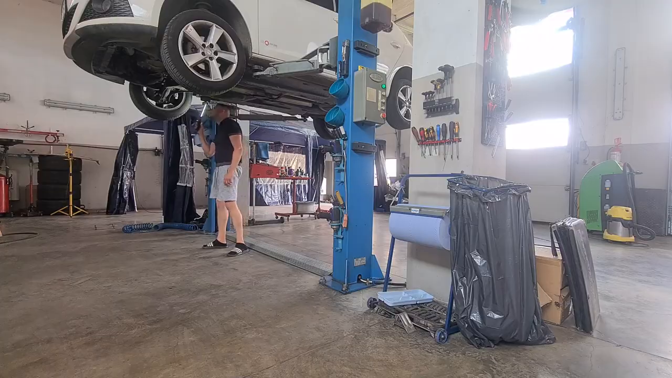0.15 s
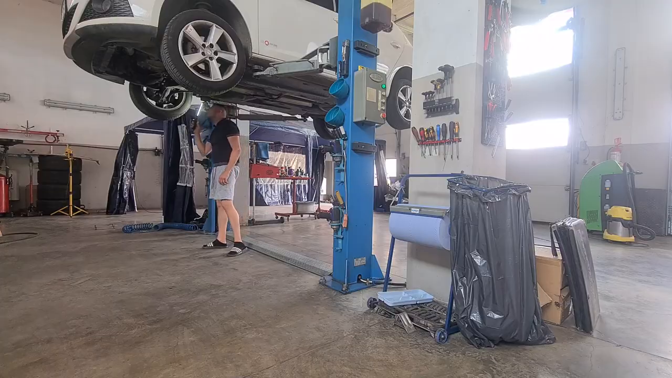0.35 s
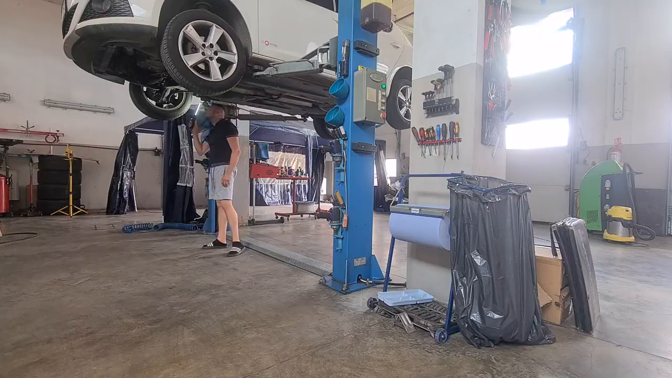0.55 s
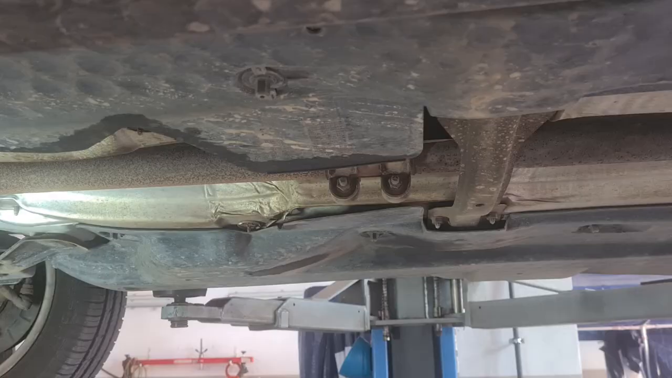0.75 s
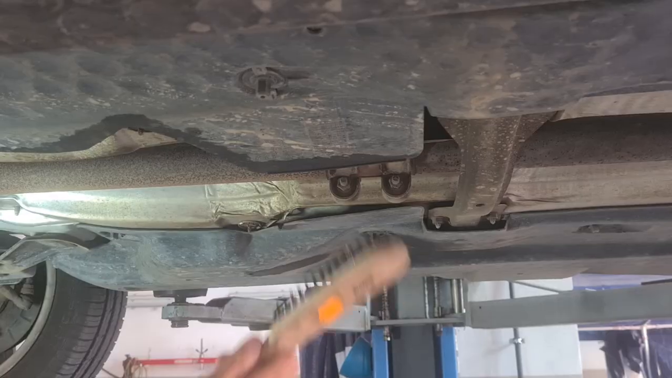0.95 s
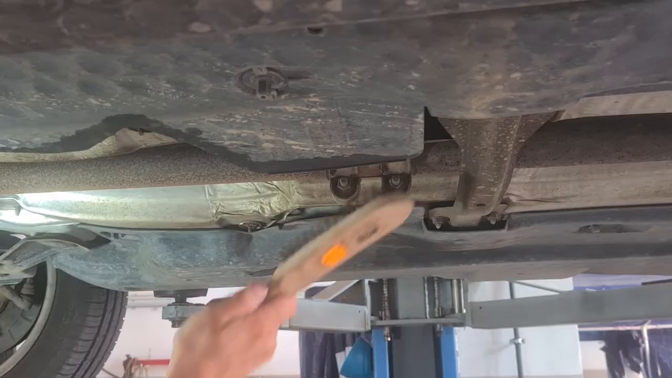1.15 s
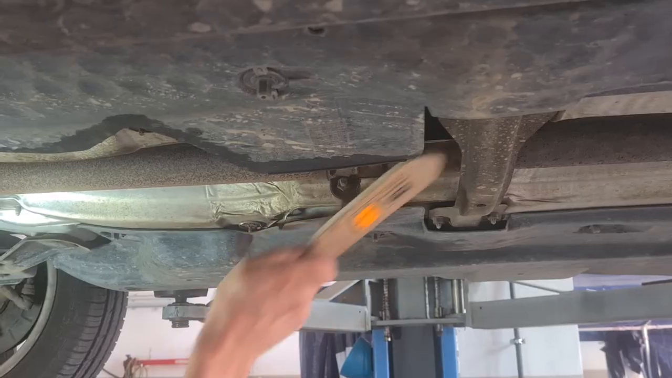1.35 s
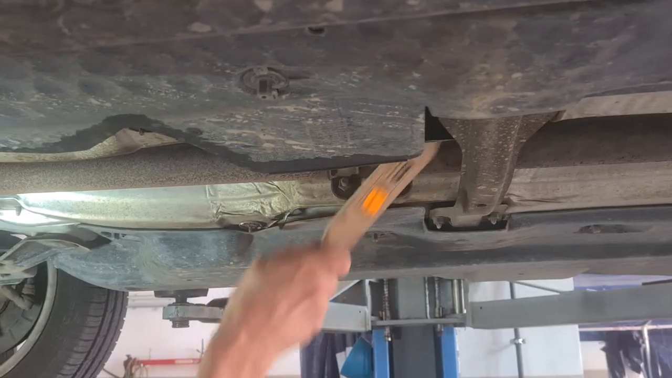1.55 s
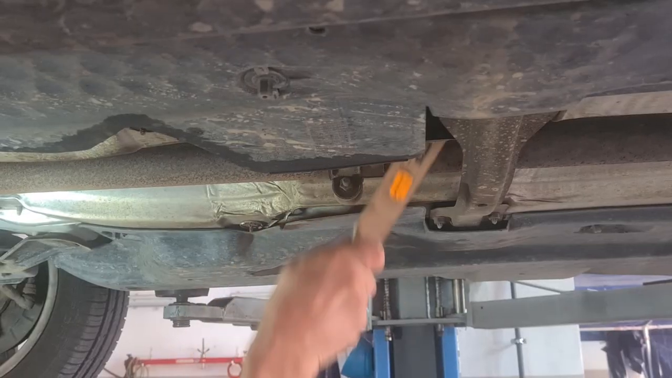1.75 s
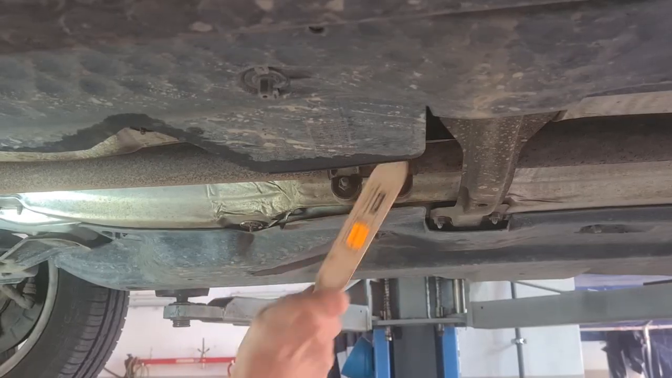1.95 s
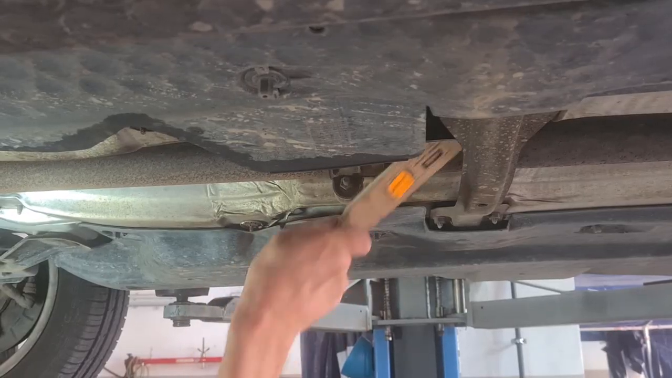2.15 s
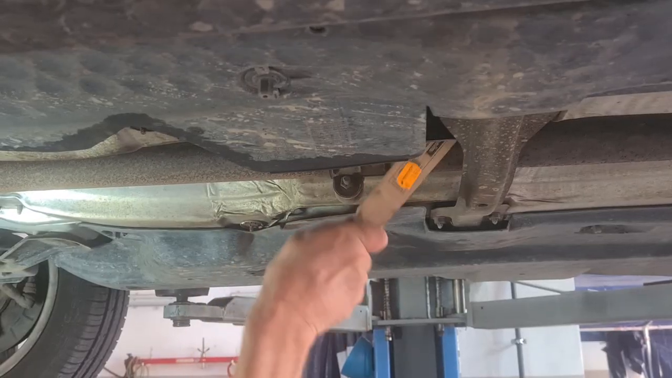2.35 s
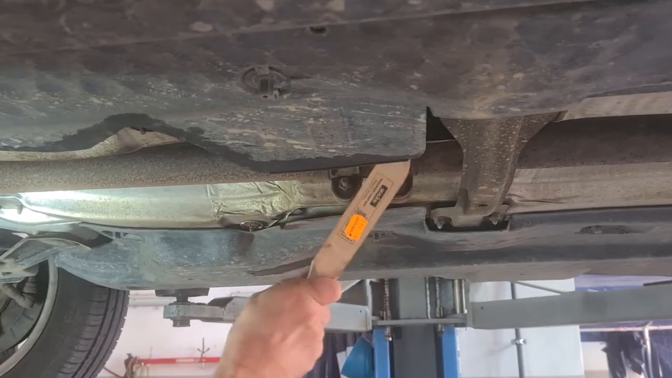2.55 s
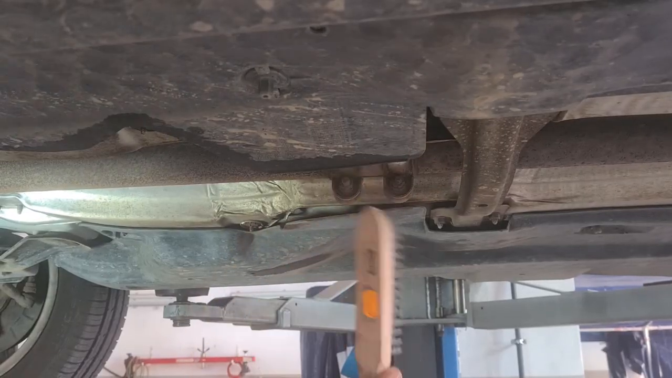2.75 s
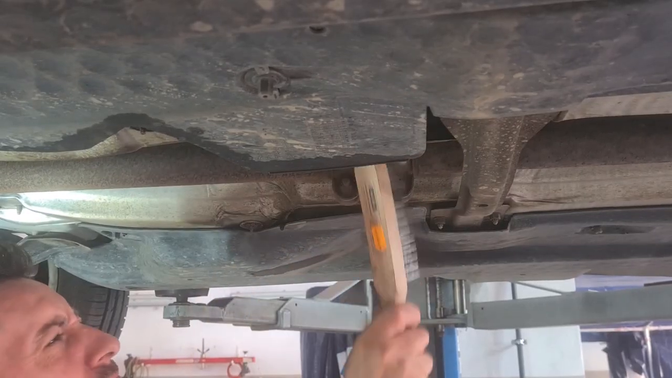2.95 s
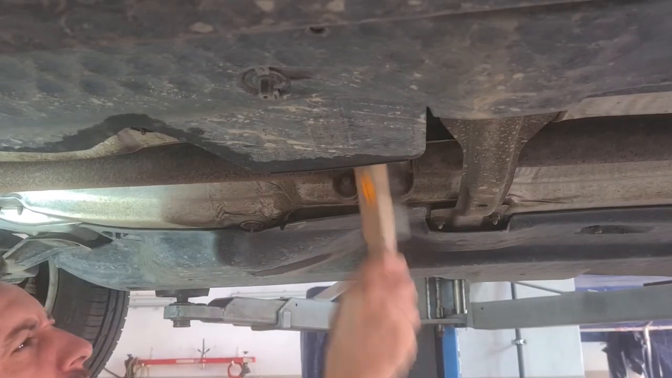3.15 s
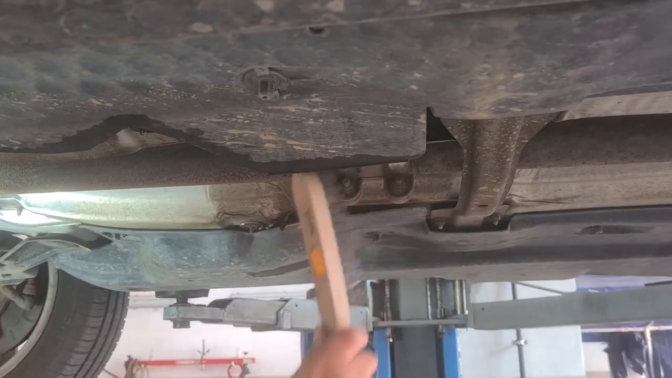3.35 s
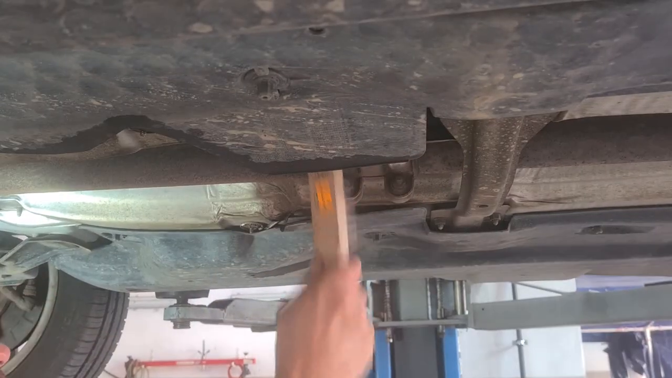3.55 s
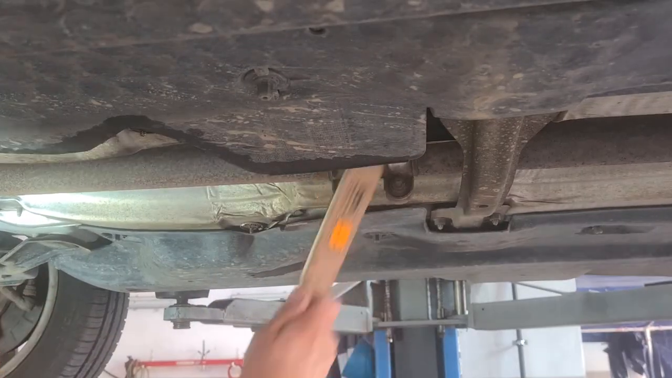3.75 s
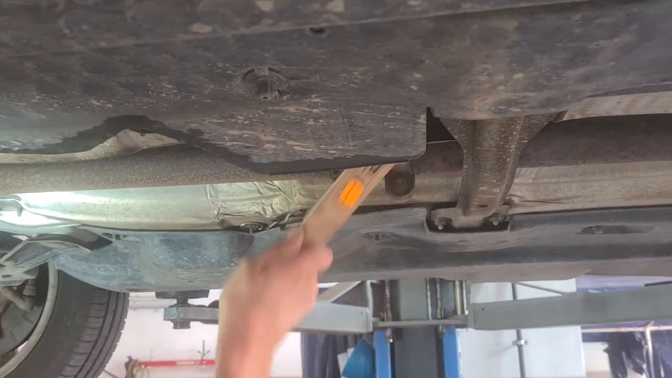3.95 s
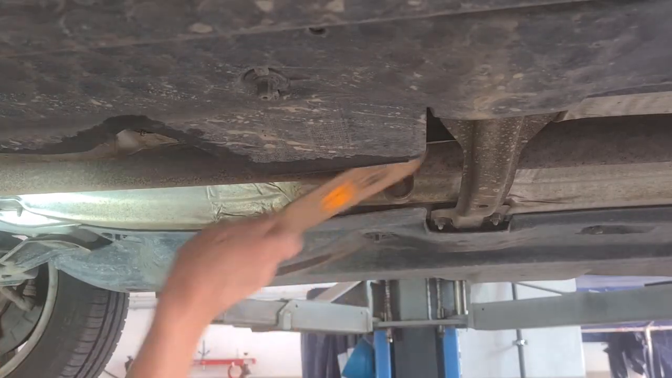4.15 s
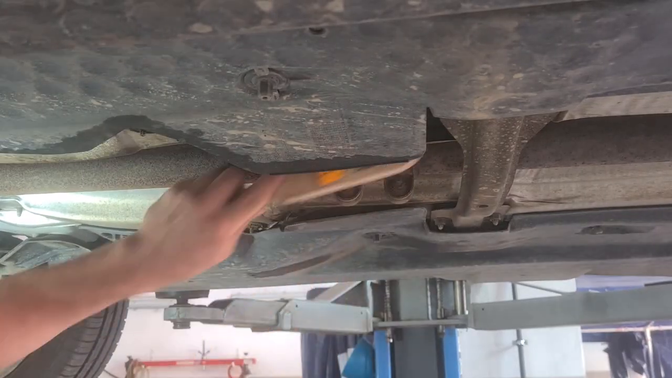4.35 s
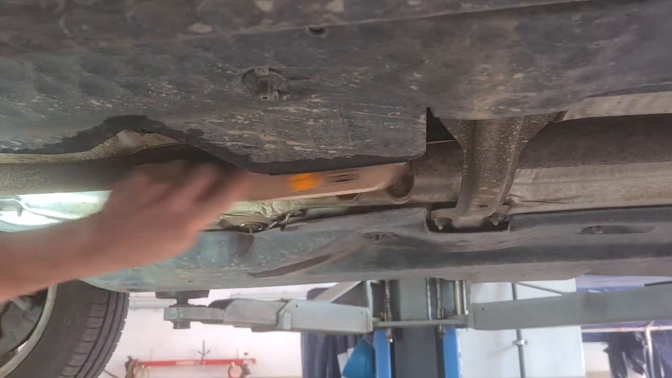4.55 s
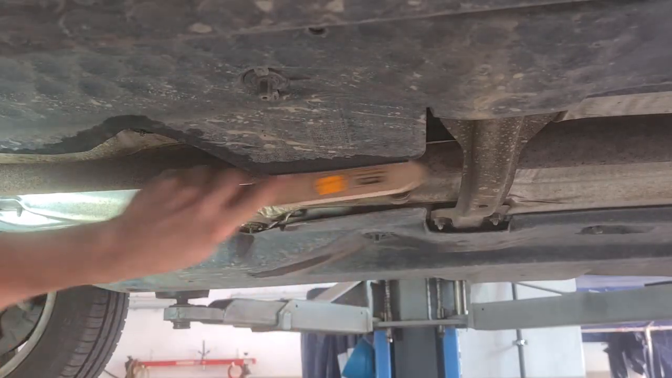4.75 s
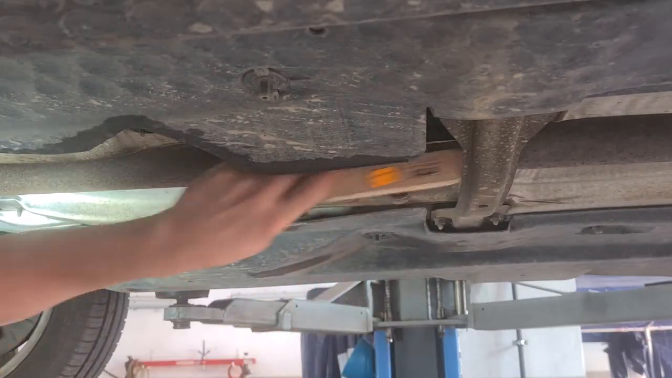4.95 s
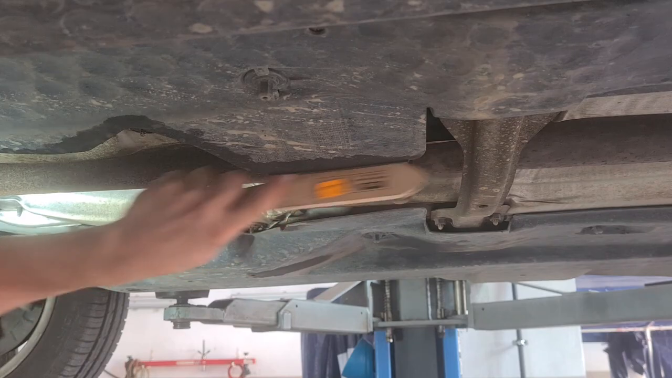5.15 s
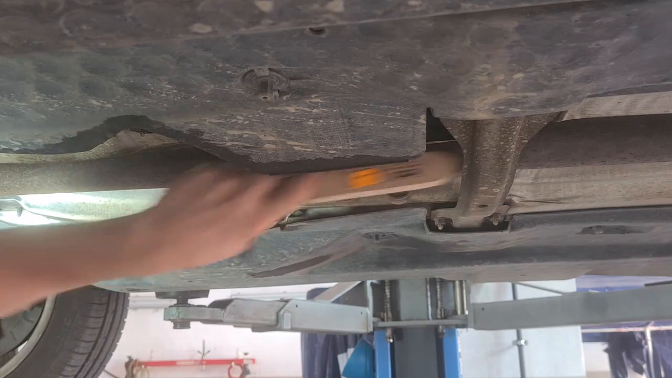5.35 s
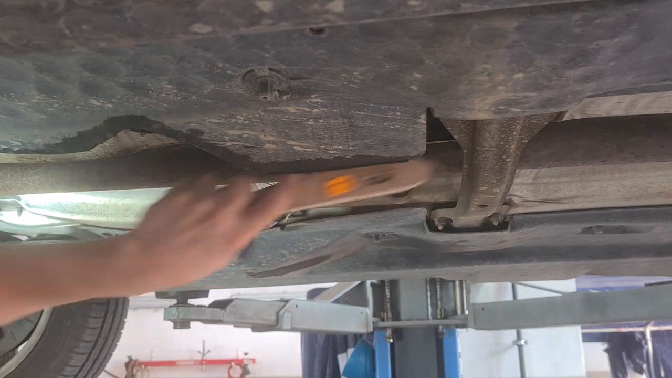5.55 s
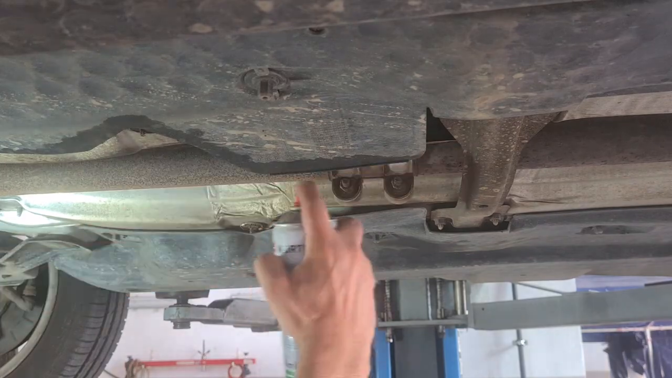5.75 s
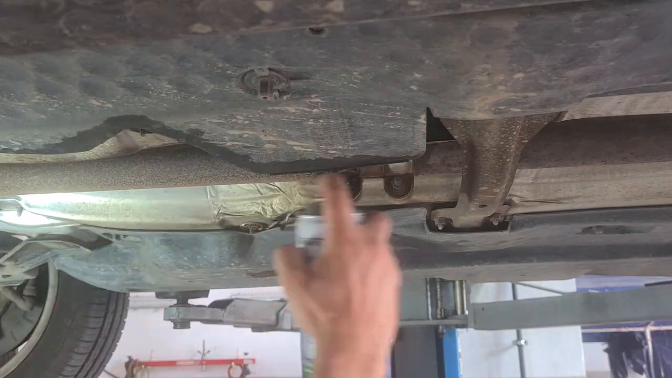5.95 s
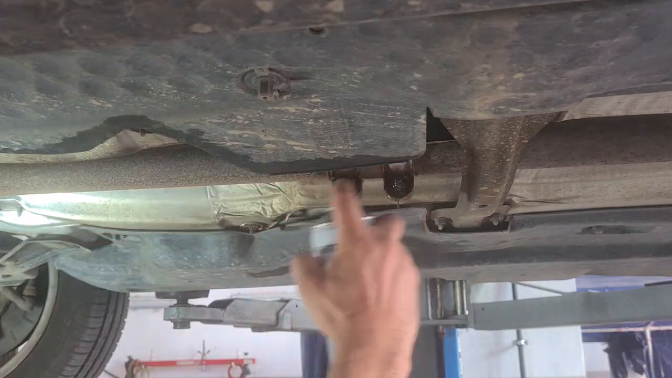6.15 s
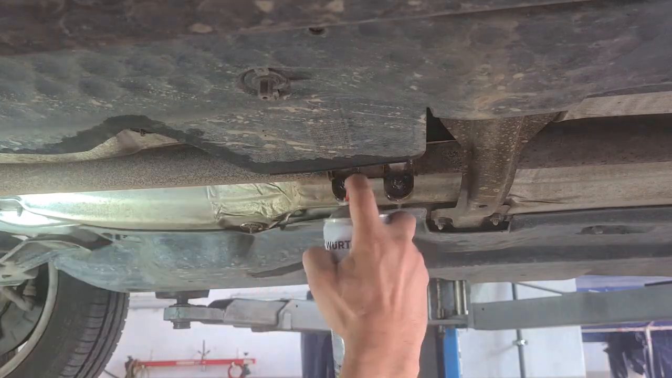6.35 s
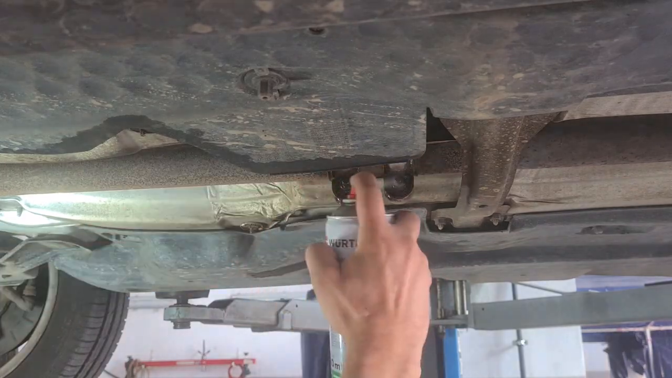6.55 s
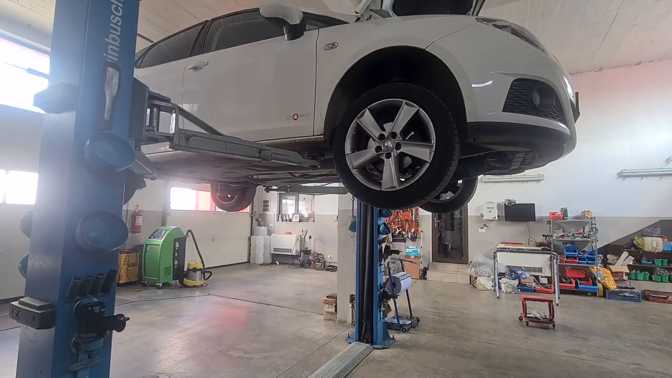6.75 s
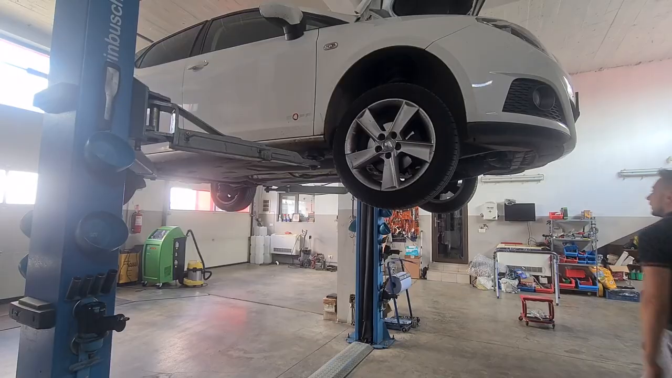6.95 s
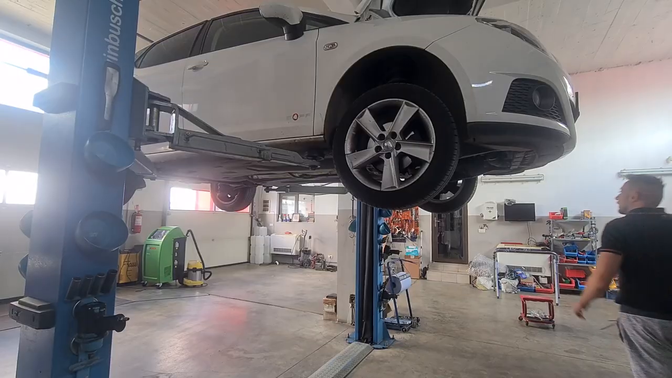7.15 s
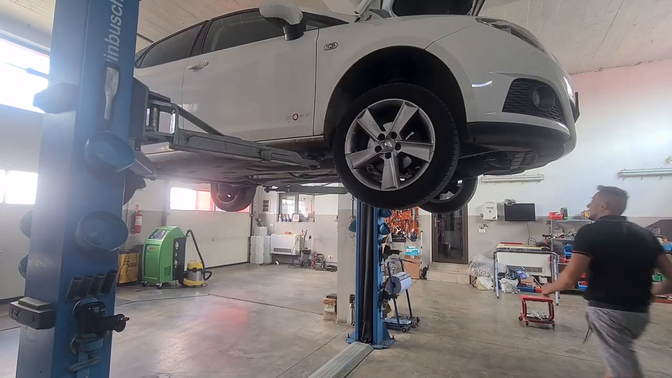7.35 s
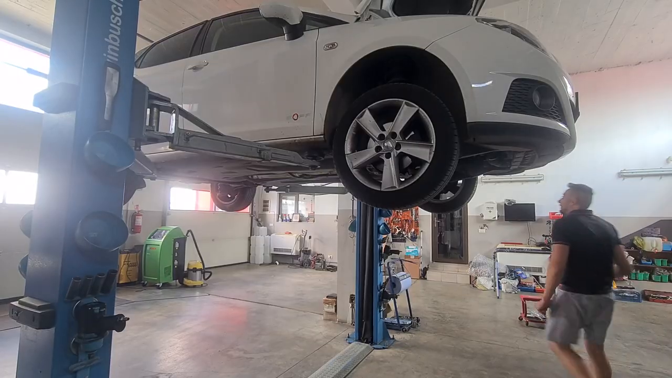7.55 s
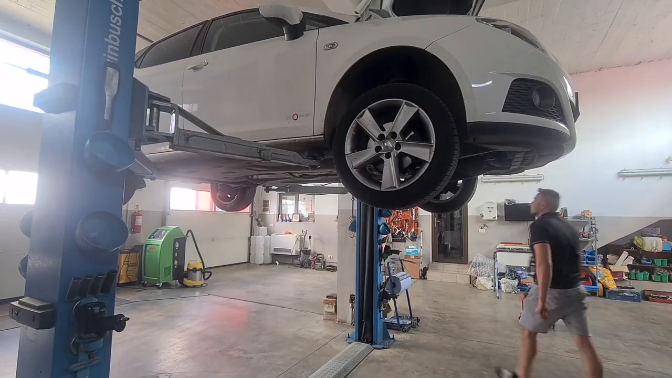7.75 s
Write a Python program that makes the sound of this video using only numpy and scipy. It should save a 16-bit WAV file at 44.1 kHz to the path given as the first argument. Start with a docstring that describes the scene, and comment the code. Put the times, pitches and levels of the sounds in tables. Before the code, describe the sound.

A stiff wire brush scrubs rusty metal in quick bursts, its wooden head knocking hollow plastic, then short aerosol squirts and a low garage hum.

```python
"""A hall hisses faintly; at 0.8 s low rumble and distant machine noise step in, and change level later.
From 1.3 s a wire brush scrubs rusty bolts on a raised car's exhaust pipe: bristle flicks ring the steel clamp.
Most pushes also knock the wooden head on the plastic underbody shield; at 3.7 s the pipe booms once.
From 5.8 s an aerosol can squirts six times as valve-gated noise. From 6.8 s a low hum of two wavering
sines comes up; at 7.4 s a burst of coloured noise rushes across the hall."""
import sys
import numpy as np
from scipy import signal
from scipy.fft import rfft, irfft, next_fast_len
from scipy.io import wavfile
from scipy.ndimage import uniform_filter1d, minimum_filter1d

SR = 44100
rng = np.random.default_rng(int(sys.argv[2]) if len(sys.argv) > 2 else 0)


def pcm_store(signal):
    """Save signal as 16-bit PCM."""
    levels = np.round(np.clip(np.atleast_2d(signal), -1, 1) * 32767)
    wavfile.write(sys.argv[1], SR, levels.astype(np.int16).T)


N = 347798
TIME = np.arange(N) / SR


def amp(db):
    """Decibels to gain."""
    return 10 ** (np.asarray(db) / 20)


def evened(x):
    """Scales to rms 1."""
    return x / np.sqrt(np.mean(x ** 2) + 1e-20)


def read(points, hz):
    """Reads a table on a log-frequency axis."""
    f, value = np.transpose(points)
    return np.interp(np.log(hz + 1), np.log(f), value)


def level_curve(rows):
    """Level in dB per sample, interpolated from (time, level) rows."""
    s, db = np.transpose(rows)
    return np.interp(TIME, s, db)


def colour(x, spectrum):
    """Filters by a spectrum table, to rms 1."""
    size = next_fast_len(x.shape[-1])
    gain = amp(read(spectrum, np.fft.rfftfreq(size, 1 / SR)))
    return evened(irfft(rfft(x, size) * gain, size)[..., :x.shape[-1]])


def noise(spectrum):
    """Coloured noise, independent left and right."""
    return colour(rng.standard_normal((2, N)), spectrum)


def place(x, side):
    """Shares each frequency between left and right."""
    size = next_fast_len(N + 2000)
    ratio = amp(read(side, np.fft.rfftfreq(size, 1 / SR)))
    gains = 2 * np.array([ratio, np.ones_like(ratio)]) / np.hypot(1, ratio)
    return irfft(rfft(x, size) * gains, size)[:, :N]


def add(mix, s, sound):
    """Mixes a stereo sound in at time s."""
    part = mix[:, max(round(s * SR), 0):][:, :sound.shape[1]]
    part += sound[:, :part.shape[1]]


def ring(modes, t):
    """Decaying sines, each with its own phase left and right."""
    out = 0
    for hz, db, t60_s in modes:
        phase = rng.random((2, 1))
        out = out + amp(db - 60 * t / t60_s) * np.sin(2 * np.pi * (hz * t + phase))
    return out


def swell(peak_s, db, rise_db_per_s, decay_db_per_s):
    """A gain that rises to one peak and dies away, both linear in dB."""
    before_db = (peak_s - TIME) * rise_db_per_s
    after_db = (TIME - peak_s) * decay_db_per_s
    return amp(db - np.maximum(before_db, after_db))


def low_tone(hz, waver):
    """A sine at rms 1 whose pitch wanders by the rms share waver."""
    drift = colour(rng.standard_normal(N), [(6, -4.5), (15, -12.0), (60, -69), (200, -120)])
    return np.sqrt(2) * np.sin(2 * np.pi * np.cumsum(hz * (1 + waver * drift)) / SR)


# hall rumble spectrum: (frequency [Hz], relative level [dB per Hz])
RUMBLE_SPECTRUM = [(20, -12), (40, -2), (58, 7.5), (80, -0.5), (110, -4.5), (160, -12), (300, -36),
                   (900, -72)]
# rumble level before trim: (time [s], level [dB])
RUMBLE_LEVEL = [(0, -52), (.74, -50.5), (.79, -31), (1.7, -31), (3.2, -43), (3.48, -28), (3.6, -37),
                (4.7, -43), (5.3, -46.5), (5.7, -42), (7.05, -38), (7.89, -35.5)]


def hall_rumble(trim_db=-1, apart=0.2):
    """Low noise, nearly alike in both channels."""
    low = noise(RUMBLE_SPECTRUM)
    difference = low[1] * np.array([[1], [-1]])
    return evened(low[0] + apart * difference) * amp(level_curve(RUMBLE_LEVEL) + trim_db)


# distant machines: (frequency [Hz], relative level [dB per Hz])
MACHINE_SPECTRUM = [(80, -31), (160, 6.5), (260, 3.5), (400, -3), (650, -5.5), (1000, -5), (1300, -8.5),
                    (1800, -19.5), (3000, -51), (6000, -96)]
# hall hiss: (frequency [Hz], relative level [dB per Hz])
HISS_SPECTRUM = [(800, -5), (1100, 1), (1700, -9), (2400, -4.5), (3100, 3.5), (3700, -0.5), (4300, -9.5),
                 (4900, -3), (5500, -12.5), (6200, -40), (9000, -53), (11500, -25), (13000, -34),
                 (16000, -36)]
# murmur in the gap under the car floor: (frequency [Hz], relative level [dB per Hz])
HOLLOW_SPECTRUM = [(70, -16), (135, 8.5), (185, -1), (250, 5.5), (320, -15), (600, -26), (1500, -50.5)]
# stepped background: (start [s], machine level [dB], hiss level [dB], under-floor murmur level [dB])
BACKGROUND_STEPS = [(0, -70, -52, -83), (0.767, -40.5, -51, -53), (2.8, -43.5, -44.5, -51),
                    (4.3, -65, -54, -52), (5.68, -50.5, -53, -45.5), (6.08, -55, -52, -55.5),
                    (6.69, -42, -53, -52)]
# far sounds, left minus right: (frequency [Hz], level difference [dB])
FAR_SIDE = [(60, 5), (200, 2), (700, 4.7), (1290, 11.2), (2380, 24), (4400, 39), (8000, 32), (15000, 8)]


def background(fade_s=0.013):
    """Machine noise, hiss and under-floor murmur, their levels held between short fades."""
    starts_s, *levels_db = np.transpose(BACKGROUND_STEPS)
    step = np.searchsorted(starts_s[1:], TIME)
    gains = uniform_filter1d(amp(levels_db)[:, step], round(fade_s * SR), axis=1)
    machines, hiss, hollow = gains
    far = machines * noise(MACHINE_SPECTRUM) + hiss * noise(HISS_SPECTRUM)
    return place(far, FAR_SIDE) + hollow * noise(HOLLOW_SPECTRUM)


# machine hum, level of the fundamental: (time [s], level [dB])
HUM_LEVEL = [(0, -51.5), (6.6, -68), (6.8, -44.5), (7.1, -43), (7.18, -33), (7.42, -27), (7.63, -38.5),
             (7.76, -30), (7.89, -29.5)]


def machine_hum(hz=69.1, overtone_db=-15):
    """Fundamental and octave, wavering independently."""
    tone = low_tone(hz, waver=0.006) + amp(overtone_db) * low_tone(2 * hz, waver=0.011)
    return amp(level_curve(HUM_LEVEL)) * tone


# bristles on the metal: (start [s], end [s])
CONTACT = [(1.275, 2.712), (2.825, 3.28), (3.4, 4.268), (4.385, 5.675)]


def contact_gain(edge_s=0.0049):
    """One while the brush is on the metal, zero once it lifts; lifting takes three times the edge."""
    return sum(np.clip(np.minimum(TIME - start, (end - TIME) / 3) / edge_s + .5, 0, 1)
               for start, end in CONTACT)


def flicks(per_s, spread_db):
    """Wire tips snap free at random moments, a few of them hard."""
    strength = amp(spread_db * np.minimum(rng.exponential(1, N), 4))
    snaps = rng.random(N) < per_s / SR
    return evened(strength * snaps * rng.standard_normal((2, N)))


def shifting(x, depth_db, patch_hz=300, patch_s=.04):
    """The wires meet ever new spots: smoothed random gains make bands come and go."""
    z = signal.stft(x, SR, nperseg=512)[2]
    patches = rng.standard_normal(z.shape[1:])
    patches = uniform_filter1d(patches, max(round(patch_hz * 512 / SR), 1), axis=0)
    patches = uniform_filter1d(patches, max(round(patch_s * SR / 256), 1), axis=1)
    return evened(signal.istft(z * amp(depth_db * evened(patches)), SR, nperseg=512)[1][:, :N])


# even scrubbing: (first push [s], last push [s], pushes [count], relative stroke level [dB],
#   fizz re stroke [dB], relative head force [dB], central blow pitch [Hz])
RUNS = [(1.672, 1.716, 2, -24.5, -20, -11, 510), (1.758, 2.015, 6, -25, -19, -4, 500),
        (2.071, 2.13, 2, -24.5, -16.5, -17, 424), (2.184, 2.447, 6, -25, -17.5, -6, 485),
        (2.499, 2.666, 4, -24, -17.5, -5, 496), (2.836, 2.916, 3, -26.5, -18.5, -5.5, 516),
        (2.962, 3.240, 7, -27, -16.5, -6.5, 588), (3.41, 3.625, 6, -27.5, -17.5, -10, 665),
        (3.674, 3.809, 4, -23.5, -20, -4, 513), (3.913, 4.224, 6, -23, -19, -10, 540),
        (4.394, 4.607, 4, -27.5, -17.5, -65, 398), (4.683, 4.895, 4, -25, -17.5, -45, 400),
        (4.969, 5.353, 6, -24, -16, -38, 400), (5.436, 5.603, 3, -23, -17, -52, 400)]
# pushes that slam or glance: (time [s], force re run [dB])
ACCENTS = [(1.811, 5.5), (1.912, -9.5), (2.014, 1.5), (2.394, 6), (3.101, 4.5), (3.496, 7.5), (3.54, 6),
           (3.626, 9.5), (4.224, 6)]
STROKE_SHARE, ACCENT_REACH_S = 0.26, 0.015  # stroke length as share of the cycle
RETURN_DB, RETURN_FIZZ_DB, STROKE_SCATTER_DB = -1.8, -1.3, 1.63  # pull re push; rms scatter
FORCE_SCATTER_DB, PITCH_SCATTER = 1.2, 0.085  # rms; pitch scatter in natural-log units
PANEL_DB, PANEL_GIVE_DB_PER_DB, USUAL_FORCE_DB = -5, 0.59, -6.5  # ringing grows slower than force


def scrubbing():
    """Every push scrapes and knocks the shield, the light late pushes only faintly; all pulls only scrape."""
    strokes, blows = [], []
    for first, last, count, db, fizz_db, force_db, hz in RUNS:
        pushes, cycle_s = np.linspace(first, last, round(count), retstep=True)
        length_s = STROKE_SHARE * cycle_s
        for s in pushes:
            push, pull, force, pitch = rng.standard_normal(4)
            push_db = db + STROKE_SCATTER_DB * push
            pull_db = db + RETURN_DB + STROKE_SCATTER_DB * pull
            strokes.append((s, length_s, push_db, fizz_db))
            strokes.append((s + cycle_s / 2, length_s, pull_db, fizz_db + RETURN_FIZZ_DB))
            accent_db = sum(extra for at, extra in ACCENTS if abs(at - s) < ACCENT_REACH_S)
            blow_db = force_db + accent_db + FORCE_SCATTER_DB * force
            ring_db = min(PANEL_DB - PANEL_GIVE_DB_PER_DB * (blow_db - USUAL_FORCE_DB), 0)
            blows.append((s, blow_db, hz * np.exp(PITCH_SCATTER * pitch), ring_db))
    return strokes, blows


# wire rasping on rust: (frequency [Hz], relative level [dB per Hz])
RASP_SPECTRUM = [(70, -3), (150, -2), (280, 1.5), (520, -1), (850, -5), (1150, 0), (1500, -6.5),
                 (2250, -8.5), (3400, 1.5), (4500, -2.5), (5350, -2), (6800, -10), (7700, -26.5),
                 (10000, -20.5), (16000, -23.5)]
# fizz of the wire tips: (frequency [Hz], relative level [dB per Hz])
FIZZ_SPECTRUM = [(3000, -23), (7500, -3), (8500, -4), (10000, -6.5), (13000, -1), (15000, -4.5),
                 (15700, 6.5), (16500, -14)]
# clamp and pipe modes: (frequency [Hz], relative level [dB], t60 [s])
STEEL_MODES = [(1100, -8, .06), (1650, -9, .04), (2612, 1, .06), (2950, -7, .03), (3376, 1, .03),
               (3490, -3, .04), (3760, -8, .04), (4167, -5, .055), (4305, -6, .055), (5020, -5, .03),
               (5274, -1, .055), (5544, -6, .065), (6030, -10, .035), (6700, -11, .025), (8590, -16, .025)]
# brush lands, feels its way or springs off:
#   (peak time [s], length [s], relative level [dB], fizz re stroke [dB])
SCRAPES = [(1.281, 0.027, -16.5, -44), (1.328, 0.073, -28, -21.5), (1.423, 0.049, -26.5, -19),
           (1.532, 0.062, -24, -19), (1.641, 0.047, -26, -22), (2.698, 0.02, -23, -30),
           (3.273, 0.012, -21.5, -19), (3.87, 0.023, -26, -17), (4.677, 0.0082, -34, -1),
           (5.654, .014, -23.5, -10)]


def brush(strokes, rasp_db=-10.0, steel_db=-15.5, fizz_db=-4,
          drag_db=-11, drag_stretch=1.2, tip_drag_db=-5):
    """Bristle flicks swell with the speed of each stroke and ring the steel."""
    power, tip_power = np.zeros((2, N))
    for s, length_s, db, tips_db in strokes + SCRAPES:
        near = slice(round((s - .07) * SR), round((s + 0.067) * SR))
        u = (TIME[near] - s) / length_s
        # power at half height spans one length
        sweep = amp(2 * db) * np.exp(-4 * np.log(2) * u ** 2)
        # bent bristles keep dragging, with little fizz, while the hand turns round
        drag_shape = np.exp(-4 * np.log(2) * (u / drag_stretch) ** 2) * (u > 0)
        drag = amp(2 * (db + drag_db)) * drag_shape
        power[near] += sweep + drag
        tip_power[near] += (sweep + drag * amp(2 * tip_drag_db)) * amp(2 * tips_db)
    press, tips = np.sqrt([power, tip_power]) * contact_gain()
    scrape = shifting(flicks(per_s=6000, spread_db=2.5), depth_db=2.5)
    fizz = shifting(flicks(per_s=7800, spread_db=1.0), depth_db=4.5)
    steel = ring(STEEL_MODES, np.arange(SR // 5) / SR)
    steel /= np.linalg.norm(steel[0])
    strikes = flicks(per_s=2700, spread_db=1.5) * press
    ringing = signal.fftconvolve(strikes, steel, axes=1)[:, :N]
    return (amp(rasp_db) * colour(scrape, RASP_SPECTRUM) * press
            + amp(steel_db) * ringing
            + amp(fizz_db) * colour(fizz, FIZZ_SPECTRUM) * tips)


# plastic shield modes: (frequency [Hz], relative level [dB], t60 [s])
SHIELD_MODES = [(257.9, 1.5, 0.19), (343.1, 3, 0.19), (413, 4.5, 0.11), (465, -11, 0.11), (535, 2, 0.096),
                (590, -16, 0.057), (783, 8, 0.044), (1010, -12, 0.024), (1188, 13.5, 0.036)]
# diffuse underbody shudder at usual hardness: (frequency [Hz], relative level [dB per Hz])
SHUDDER_SPECTRUM = [(50, -7.5), (110, -7.5), (200, -8.5), (280, 1), (450, -4), (700, -6), (900, -14.5),
                    (1200, -14), (1500, -20), (2500, -27), (6000, -64), (12000, -80)]
# crack of wood on plastic: (frequency [Hz], relative level [dB per Hz])
CRACK_SPECTRUM = [(400, -24), (800, 2.5), (1200, 1), (1800, -7), (3500, -8), (7000, -27.5), (14000, -48)]
# stray head bumps: (time [s], relative force [dB], blow pitch [Hz], panel ringing re blow [dB])
BUMPS = [(1.3091, -7.5, 393, -4.5), (1.3294, -4, 312, -6.5), (1.5505, -14, 567, 3.5),
         (4.4012, -2, 408, -7.5), (4.4753, -20.5, 415, -7), (4.682, -16.5, 316, -6.5),
         (4.7518, -12, 312, -1.5), (4.9832, -26.5, 334, 4.5), (5.1297, -14, 300, -6.5),
         (5.2953, -29, 413, -6), (5.5236, -16.5, 470, -4)]


def knocks(hits, blow_db=-2.0, overtone_db=-12, modes_db=-11.0, shudder_db=-7, crack_db=-19,
           rise_s=0.0012, fall_s=0.0017, build_s=0.004, shudder_t60_s=0.12, lag_s=0.00044,
           spot_db=1.5, usual_hz=500, harden_db=8):
    """A cushioned blow of a few cycles, then the shield rings and the underbody shudders."""
    out, lead_s = np.zeros((2, N)), .01
    t = np.arange(SR // 4) / SR - lead_s
    after = np.maximum(t, 0)
    spreading = np.clip(t / build_s + 0.073, 0, 1)  # bending waves need time to fill the panel
    u = t - np.array([[0], [lag_s]])  # the blow reaches the right channel later
    for s, db, hz, ring_db in hits + BUMPS:
        # a higher pitch means a harder blow: shorter, with more overtone and crack
        hardness = hz / usual_hz
        contact = np.exp(np.where(u < 0, -(u * hardness / rise_s) ** 2 / 2, -u * hardness / fall_s))
        thud = np.cos(2 * np.pi * (hz * u + rng.random() + 0.28 * rng.random((2, 1))))
        overtone = np.cos(2 * np.pi * (1.79 * hz * u + rng.random((2, 1))))
        crack = colour(rng.standard_normal(u.shape), CRACK_SPECTRUM)
        bright = amp(overtone_db) * contact * overtone + amp(crack_db) * crack
        blow = contact * (amp(blow_db) * thud + amp(harden_db * np.log2(hardness)) * bright)
        # modes answer best near the blow's pitch, with random differences for the spot struck
        modes = []
        for f, level, t60_s in SHIELD_MODES:
            mismatch_db = 10 * np.log10(1 + (f / hz) ** 4 + (hz / f / 1.42) ** 4)
            modes.append((f, level + spot_db * rng.standard_normal() - mismatch_db, t60_s))
        spectrum = [(f * np.sqrt(hardness), level) for f, level in SHUDDER_SPECTRUM]
        shudder = colour(rng.standard_normal(u.shape), spectrum)
        shudder_gain = amp(shudder_db - 60 * after / shudder_t60_s)
        tail = amp(modes_db) * ring(modes, after) + shudder_gain * shudder
        add(out, s - lead_s, amp(db) * (blow + spreading * amp(ring_db) * tail))
    return out


# hall decay: (frequency [Hz], t60 [s])
HALL_T60 = [(100, 0.63), (500, 0.26), (3000, 0.18), (6000, 0.13), (9000, 0.079), (16000, 0.093)]


def echo(x, build_s=0.029, count=3, turns_per_s=20):
    """Decaying-noise tails, treble mostly dying first, crossfade in turn so reflections vary."""
    out = np.zeros((2, N))
    for k in range(count):
        hz, t, z = signal.stft(rng.standard_normal((2, SR * 2 // 3)), SR, nperseg=256)
        decay = amp(-60 * t / read(HALL_T60, hz)[:, None])
        tail = signal.istft(z * decay, SR, nperseg=256)[1]
        tail *= np.clip(np.arange(tail.shape[1]) / SR / build_s, 0, 1)
        turn = (TIME * turns_per_s - k) % count
        share = np.sin(np.pi / 2 * turn) * (turn < 2)  # squared shares sum to one
        out += signal.fftconvolve(x * share, tail / np.linalg.norm(tail[0]), axes=1)[:, :N]
    return out


# pipe boom: (peak level [dB], rise [dB/s], decay [dB/s])
BOOM_SWELL = (-22.5, 210, 56)


def pipe_boom(peak_s=3.68, hz=103.5):
    """The exhaust pipe, pushed hard, booms once as a wavering low tone."""
    return swell(peak_s, *BOOM_SWELL) * low_tone(hz, waver=0.019)


# aerosol squirts: (half-open time [s], half-closed time [s], fully open level [dB])
SQUIRTS = [(5.843, 5.947, -49.5), (6.05, 6.175, -56), (6.24, 6.28, -52), (6.343, 6.404, -47.5),
           (6.474, 6.518, -47), (6.564, 6.616, -46.5)]
# spray noise: (frequency [Hz], relative level [dB per Hz])
SPRAY_SPECTRUM = [(880, -13), (1500, 3), (3090, -5.5), (3730, 4.5), (5020, 0), (5880, -6), (6630, -4.5),
                  (8240, -22), (12700, -8.5), (16000, -16)]


def spray(opening_s=0.054, closing_s=0.023, sputter_db=2):
    """The nozzle hisses and sputters while the valve is open."""
    valve = np.zeros(N)
    for start, end, db in SQUIRTS:
        ramp = np.minimum((TIME - start) / opening_s, (end - TIME) / closing_s) + .5
        valve += amp(db) * np.clip(ramp, 0, 1) ** 1.3
    sputter = colour(rng.standard_normal(N), [(10, 6), (60, 2), (300, -23), (2000, -70)])
    return valve * amp(sputter_db * sputter) * noise(SPRAY_SPECTRUM)


# broad rush: (frequency [Hz], relative level [dB per Hz])
RUSH_SPECTRUM = [(120, -11), (210, 8.5), (330, 2), (470, 3.5), (620, 0), (850, 6), (1100, 3.5),
                 (1400, -7.5), (2000, -14.5), (4000, -61)]
# its swell: (peak level [dB], rise [dB/s], decay [dB/s])
RUSH_SWELL = (-35, 130, 2.5)


def rush(peak_s=7.41):
    """Broad noise swells quickly across the hall and sinks slowly."""
    return swell(peak_s, *RUSH_SWELL) * noise(RUSH_SPECTRUM)


# near work, left minus right: (frequency [Hz], level difference [dB])
NEAR_SIDE = [(60, 1.5), (200, 3), (700, 4), (1290, 8), (2380, 12.5), (4400, 15), (6000, 31), (7400, 38),
             (8600, 12.5), (11000, 9.5), (15000, 3.5)]


def scene(brush_wet_db=-12, knock_wet_db=-17):
    """Work close by under the car, in a large hall."""
    hall = hall_rumble() + background() + machine_hum()
    strokes, hits = scrubbing()
    scrub, blows = brush(strokes), knocks(hits)
    near = scrub + blows + echo(amp(brush_wet_db) * scrub + amp(knock_wet_db) * blows)
    far = spray() + rush()
    return hall + place(near, NEAR_SIDE) + pipe_boom() + place(far, FAR_SIDE)


def record(dry, edge_hz=15950):
    """A fast limiter holds down peaks over full scale; then a low-pass sets the band limit."""
    room = minimum_filter1d(1 / np.maximum(abs(dry).max(axis=0), 1), size=200)
    limited = dry * uniform_filter1d(room, size=200)
    lowpass = signal.firwin(511, edge_hz, window=("kaiser", 9), fs=SR)
    return signal.oaconvolve(limited, lowpass[None], "same")


dry = scene()
out = record(dry)
pcm_store(out)
```